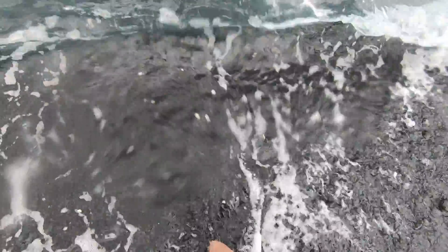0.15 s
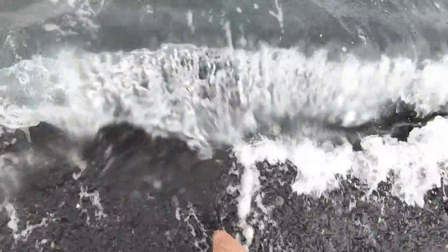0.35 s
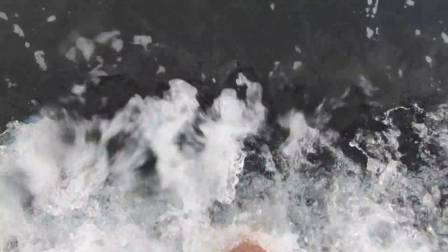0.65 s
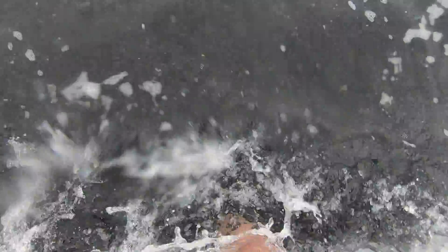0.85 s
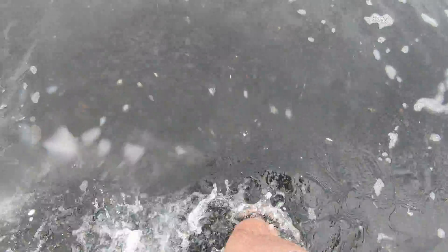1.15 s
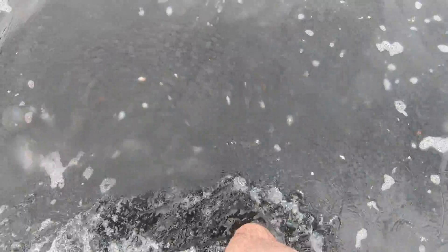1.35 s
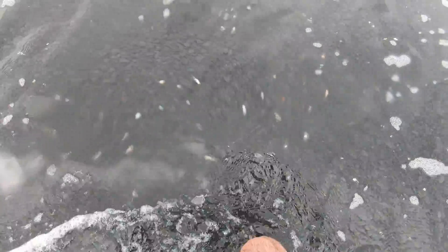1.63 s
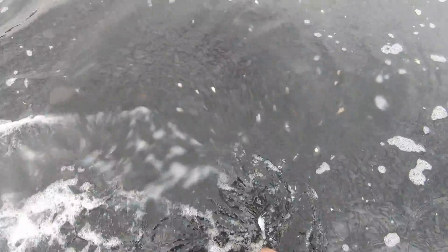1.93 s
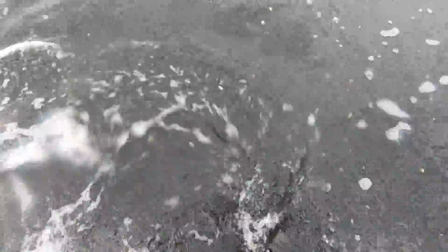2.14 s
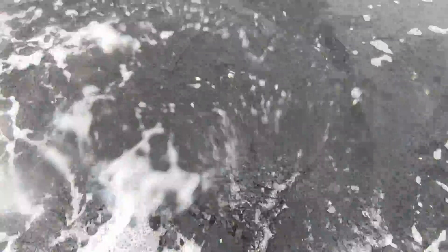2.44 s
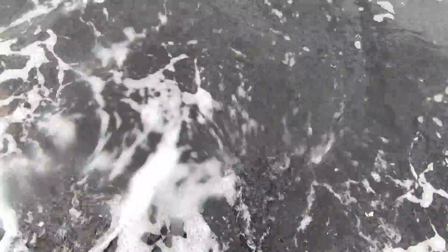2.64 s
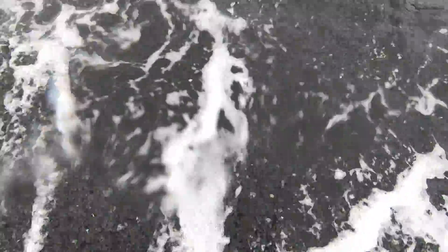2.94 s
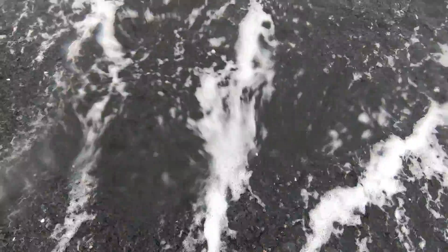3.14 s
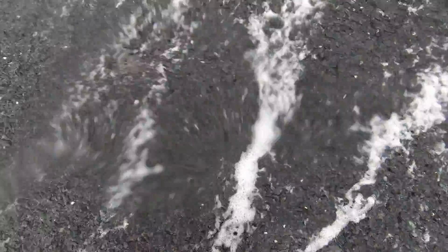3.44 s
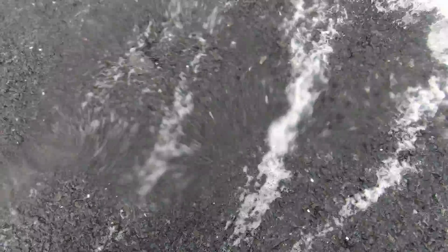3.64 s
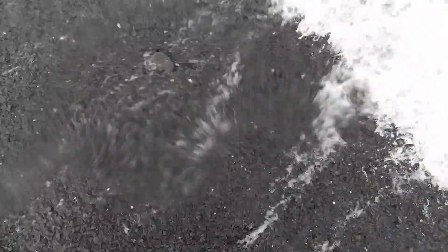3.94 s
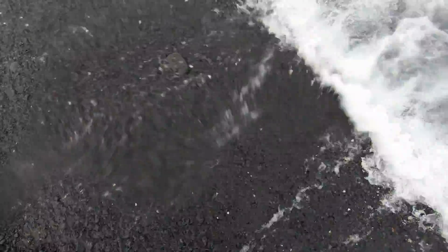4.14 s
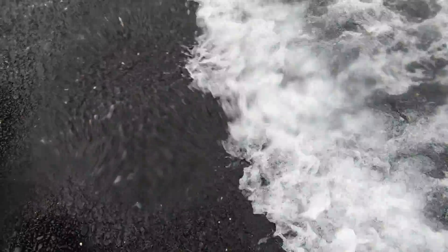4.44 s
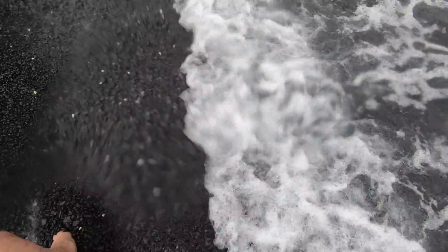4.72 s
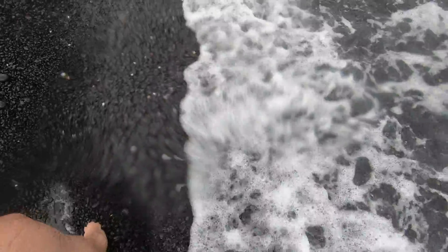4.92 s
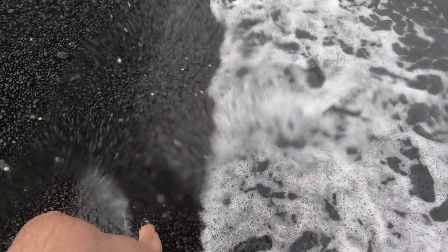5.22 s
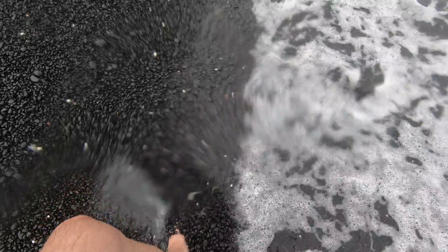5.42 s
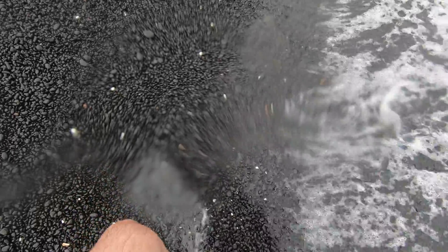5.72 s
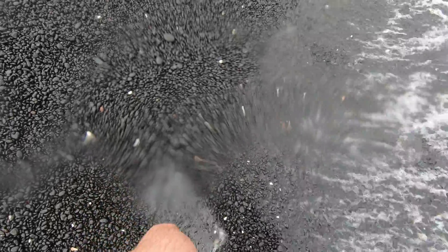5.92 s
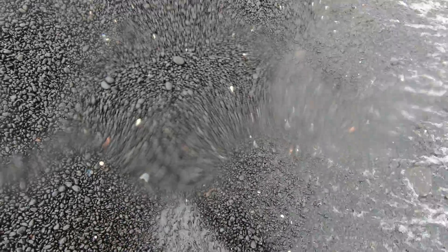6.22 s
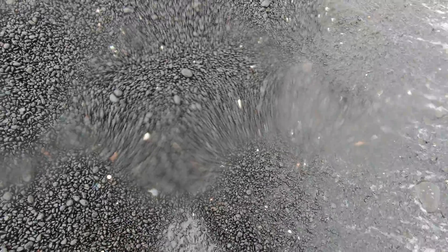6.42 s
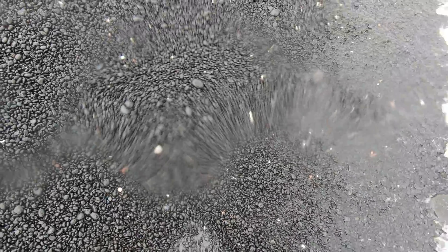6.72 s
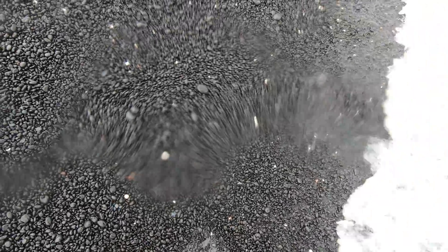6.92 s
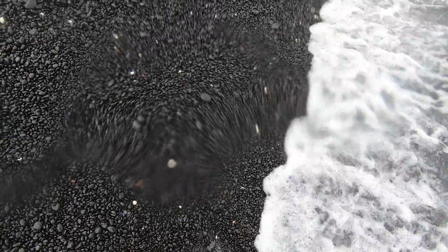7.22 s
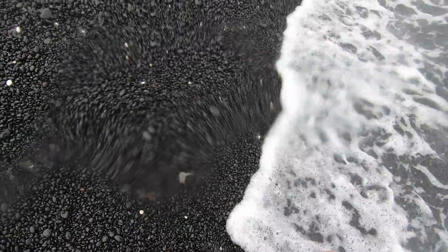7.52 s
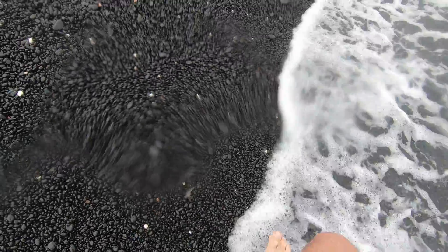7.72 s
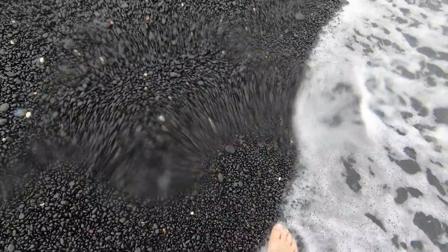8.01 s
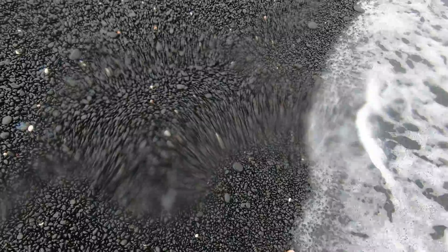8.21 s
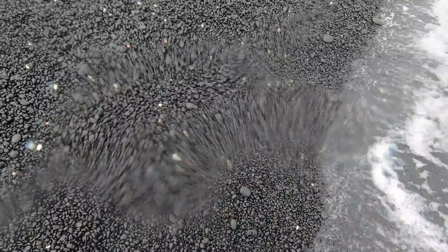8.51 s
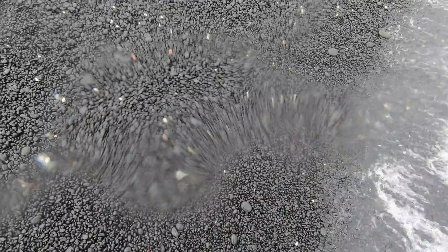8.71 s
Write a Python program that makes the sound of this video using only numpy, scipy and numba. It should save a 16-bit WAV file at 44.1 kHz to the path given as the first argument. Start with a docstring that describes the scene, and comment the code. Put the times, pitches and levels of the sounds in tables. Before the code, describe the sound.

Foamy surf rushes close by and fizzes away on pebbles, interrupted by hollow plastic handling clunks, dragging fingers and low rumbling wind.

```python
"""Small waves hiss up a pebble beach and drain back, heard at the two ports of a hand-held camera in a plastic case.
Foam is noise with bursting bubbles, coloured by the port resonances; big bubbles gulp as chirped sines.
Knocks and dragging fingers ring damped case modes, brief tones squeak, and wind and the ringing after
knocks boom and rumble as narrow noise. A limiter ducks all but the bass after loud peaks."""
import sys
import numpy as np
from scipy import signal
from scipy.fft import next_fast_len
from scipy.io import wavfile
from scipy.ndimage import uniform_filter1d
from numba import njit

SR = 44100
rng = np.random.default_rng(int(sys.argv[2]) if len(sys.argv) > 2 else 0)


def store_wav(level_fs):
    """Save 16-bit WAV to argv[1]."""
    pcm = np.round(np.clip(np.atleast_2d(level_fs), -1, 1) * 32767)
    wavfile.write(sys.argv[1], SR, pcm.T.astype(np.int16))


def convert_level_to_amplitude(level_db):
    """Map a level in decibels to its linear amplitude factor."""
    exponent = np.asarray(level_db, float) / 20
    return 10 ** exponent


N = 390770  # samples


def level(x):
    """Normalisation: scale to a root mean square of 1."""
    return x / np.sqrt(np.mean(x ** 2))


def band(x, lo_hz, hi_hz):
    """Band-pass filtering by a Butterworth response."""
    return signal.sosfilt(signal.butter(2, [lo_hz, hi_hz], "band", fs=SR, output="sos"), x)


def walk(rate, size):
    """Slow random modulation: levels held for 1 / rate s, smoothed twice, with an rms of 1."""
    hold = max(int(SR / rate), 1)
    steps = np.repeat(rng.standard_normal(size // hold + 1), hold)
    return level(uniform_filter1d(uniform_filter1d(steps, hold), hold)[:size])


def curve(table):
    """Linear interpolation: columns of a table drawn out over time."""
    s, *columns = np.transpose(table)
    return [np.interp(np.arange(N) / SR, s, c) for c in columns]


def swells(rows, rise_s, fade_db_per_s):
    """Incoherent addition: events (s, length s, dB) rise, hold and decay exponentially, summed in power."""
    s, length, db = np.transpose(rows)[:, :, None]
    t = np.arange(0, N, 64) / SR
    fade_db = fade_db_per_s * np.maximum(t - s - length, 0)
    gain = np.clip((t - s) / rise_s, 0, 1) * convert_level_to_amplitude(db - fade_db)
    return np.interp(np.arange(N) / SR, t, np.sqrt(np.sum(gain ** 2, axis=0)))


BUBBLES_PER_S, BUBBLE_HZ = 160, (1400, 3600)  # rate for each of six bubble sizes, range of pitch
POPS_DB, BUBBLE_DB = -4, -13  # levels against the hiss


def foam():
    """Shot noise and bubble resonance: hiss, dense pops in patches, and small bubbles ringing for a few cycles."""
    pop_gain = convert_level_to_amplitude(np.minimum(2.5 * rng.exponential(size=N), 9))
    pops = (rng.random(N) < 1500 / SR) * rng.standard_normal(N) * pop_gain
    t = np.arange(SR // 100) / SR
    rings = np.zeros(N)
    for hz in np.geomspace(*BUBBLE_HZ, 6):
        bursts = (rng.random(N) < BUBBLES_PER_S / SR) * rng.random(N)
        ring = np.sin(2 * np.pi * hz * t * (1 + hz * t / 60)) * np.exp(-t * hz / 4)  # the pitch rises
        rings += signal.oaconvolve(bursts, ring)[:N]
    patchy_pops = level(pops * convert_level_to_amplitude(2 * walk(16, N)))
    return level(rng.standard_normal(N) + convert_level_to_amplitude(POPS_DB) * patchy_pops + convert_level_to_amplitude(BUBBLE_DB) * level(rings))


# The state of the water near the feet, its mean removed before use; froth brightens the hiss, depth fills
# out the gush. Each row: time in seconds, wash in dB, froth in dB, depth in dB.
WATER = [(0.0, -51, -3, 3), (0.17, -44.5, -3.5, -4), (0.49, -42, 7.5, 3.5), (0.68, -39.5, 4, 7.5),
         (1.0, -45, -0.5, 8.5), (1.3, -45, -13, 9), (1.52, -46.5, -13.5, 7), (1.75, -46, -14, -2),
         (3.01, -44.5, 4, -6.5), (3.45, -44.5, 6.5, -4.5), (3.75, -37.5, -1.5, -6), (3.95, -42, -0.5, -2.5),
         (4.88, -55, 7, 4), (5.38, -54, 14.5, 2), (6.0, -48, 0.5, -2), (6.22, -41.5, -2.5, -1),
         (6.75, -50.5, -1.5, 2.5), (7.05, -49, -7.5, 5), (7.45, -53, -9, 0.5), (7.87, -62.5, 6, 2),
         (8.34, -57.5, -4.5, 2), (8.51, -56.5, 0, 4.5), (8.86, -47.5, 2.5, 1.5)]
# Places of the surf's parts in the spectrum: thunder, roar, gush, wash, fizz and spray, each in Hz.
SURF_PARTS_HZ = (300, 750, 1500, 2800, 5500, 11000)
# Breakers collapsing; the last row is a low roar from handling of the case.
# Each row: start in seconds, length in seconds, roar and thunder in dB above the lull.
ROARS = [(0.198, 0.51, 22.4, 21.4), (3.03, 1, 8.5, 12.4), (4.15, 0.9, 11.8, 21.6), (6.12, 0.65, 18, 18.4),
         (8.3, 0.64, 14, 8.8)]
# Splashes of spray close by. Each row: time in seconds, level in dB above the foam.
SPLASHES = [(0.271, 9.5), (7.464, 4), (7.485, 6), (7.576, 3.5), (7.627, 7), (7.688, 10), (7.97, 5.5)]
# Colour of the two ports. Each row: frequency in Hz, left and right relative level in dB.
PORTS = [(193, -17.5, -14.5), (580, -25, -16), (954, -20, -13), (1150, -5.5, -6), (1340, -14, -9),
         (1426, -2.5, -3.5), (1560, -7.5, -5), (1980, -9, -4.5), (2890, -8, -9), (3180, -14, -13),
         (4300, -25.5, -19), (5170, -19.5, -13.5), (5760, -16.5, -9), (7360, -26.5, -21),
         (10080, -40.5, -40.5), (12700, -57, -53)]
# How alike the ports hear the surf. Each row: frequency in Hz, likeness from 0 to 1, lead of the left in radians.
LIKENESS = [(192, .7, -.3), (430, .5, -1), (700, .8, -3.3), (1200, .98, -4), (1500, .96, -4.7),
            (2200, .85, -5.8), (2650, .35, -5.5), (3300, .75, -4.9), (4300, .45, -5.1), (4900, .7, -3.3),
            (5900, .65, -3.6), (8600, .2, -3.7), (10300, .28, -6.9)]
SURF_DB = -22.5  # applied after the port colour
FIZZ_PER_FROTH = 0.38  # dB of fizz for each dB of spray
ROAR_RISE_S, ROAR_FADE_DB_PER_S, THUNDER_FADE_DB_PER_S = 0.16, 15.5, 19.5


def surf():
    """Partial coherence and spectral shaping: foam partly shared by the ports, tilted by wave and roars."""
    splash_db = sum(db * np.exp(-((np.arange(N) / SR - s) / 0.0075) ** 2) for s, db in SPLASHES)
    flicker = convert_level_to_amplitude(0.5 * walk(7, N) + walk(25, N) + splash_db)
    hz, s, (shared, own) = signal.stft(flicker * np.array([foam(), foam()]), SR, nperseg=1024)
    log_hz = np.log(hz + 1)

    def spectrum(table):
        table_hz, *columns = np.transpose(table)
        return [np.interp(log_hz, np.log(table_hz), c)[:, None] for c in columns]

    left_db, right_db = spectrum(PORTS)
    alike, lead = spectrum(LIKENESS)
    at = np.minimum(s * SR, N - 1).astype(int)
    wash, froth, depth = (c[at] for c in curve(WATER))
    roars = np.array(ROARS)
    roar_gain = swells(roars[:, [0, 1, 2]], ROAR_RISE_S, ROAR_FADE_DB_PER_S)[at]
    thunder_gain = swells(roars[:, [0, 1, 3]], ROAR_RISE_S, THUNDER_FADE_DB_PER_S)[at]
    roar, thunder = (10 * np.log10(1 + gain ** 2) for gain in (roar_gain, thunder_gain))
    parts = wash + np.array([thunder, roar, depth, 0 * wash, FIZZ_PER_FROTH * froth, froth])
    parts -= parts.mean(axis=1, keepdims=True)  # the ports set the mean colour, the parts move it
    weights = np.array([np.interp(log_hz, np.log(SURF_PARTS_HZ), row) for row in np.eye(len(parts))])
    # below the lowest port point the sound belongs to the wind and the case
    gain = convert_level_to_amplitude(weights.T @ parts) * np.clip(hz / 160, 0, 1)[:, None] ** 2
    left = convert_level_to_amplitude(left_db) * (alike * np.exp(1j * lead) * shared + np.sqrt(1 - alike ** 2) * own)
    right = convert_level_to_amplitude(right_db) * shared
    return signal.istft(gain * np.array([left, right]), SR, nperseg=1024)[1][:, :N] * convert_level_to_amplitude(SURF_DB)


GULPS_PER_S, GULP_HZ = 15, (180, 730)
GULP_DB = -50  # of the loudest bubbles, before the roar and the port gains


def gulps():
    """Bubble resonance: big bubbles plop with a rising pitch, louder during a roar."""
    roar = swells(np.array(ROARS)[:, :3], ROAR_RISE_S, 2 * ROAR_FADE_DB_PER_S)
    out = np.zeros(N + SR)
    t = np.arange(SR // 10) / SR
    for when, pitch, weakness in rng.random((int(GULPS_PER_S * N / SR), 3)):
        i = int(when * N)
        hz = GULP_HZ[0] * (GULP_HZ[1] / GULP_HZ[0]) ** pitch
        chirp = np.sin(2 * np.pi * hz * t * (1 + 0.018 * hz * t))
        plop = chirp * np.exp(-t * hz / 3.6) * (1 - np.exp(-t * hz))
        out[i:i + len(t)] += roar[i] * convert_level_to_amplitude(GULP_DB - 17 * weakness) * plop
    return out[:N] * np.array([[0.3], [1]])


# Modes of the case. Each row: frequency in Hz, 60 dB decay time in seconds, relative level in dB,
# right port gain with sign (the left is 1).
CASE_MODES = [(104, .3, -5, 1.9), (220, .1, -5, -.3), (340, .08, 0, -.75), (620, .026, -3, -1.9),
              (800, .016, -6, -2.2), (1400, .01, -5, .6), (525, 1., -34, 1.), (1790, .8, -31, 1.),
              (1750, .009, -6, .8), (2400, .008, 2, -.4), (3200, .007, -7, .5), (4930, .012, -7, -.6),
              (6280, .006, -13, -.5), (10000, .004, -28, .6)]
# Knocks on the case. Each row: time in seconds, panel, thump and snap strength in dB.
KNOCKS = [(0.148, -27, -34, -60), (0.206, -30, -30, -60), (0.35, -47, -36, -60), (1.4017, -15, -29, -46),
          (1.421, -22, -33, -58), (3.2727, -25, -26, -21.5), (3.352, -36, -23, -38),
          (3.5896, -28, -48, -23), (3.6416, -24.5, -31, -24), (3.8922, -21.5, -20.5, -15),
          (3.9432, -16, -21, -6), (4.0473, -22, -22, -37), (5.758, -33.5, -72, -60),
          (8.0036, -30, -22, -47), (8.071, -44, -37, -60), (8.186, -45, -38.5, -60), (8.265, -41, -49, -60),
          (8.318, -34, -31, -58.5), (8.345, -41, -41, -60), (8.3718, -30.5, -37, -30),
          (8.414, -26.5, -33, -27), (8.463, -37, -27, -45), (8.484, -27, -18, -30),
          (8.4964, -11.5, -29, -9), (8.6496, -2.5, -24, -1)]
# Fingers dragging on the case. Each row: start in seconds, end in seconds, strength in dB.
RUBS = [(0., .28, -43), (1.39, 1.47, -41), (3.03, 3.25, -46), (3.26, 3.41, -30), (3.41, 3.72, -41),
        (8.3, 8.48, -53), (8.48, 8.595, -39), (8.595, 8.625, -30), (8.625, 8.65, -20)]
BODY_DB = 2.5  # the body modes answer this far above midway between panel and thump


def case():
    """Modal excitation: knocks and a jerky drag ring damped modes; some swing opposite ways at the two ports."""
    knocks, t, out = np.array(KNOCKS), np.arange(SR // 2) / SR, np.zeros((2, N))
    s, panel, thump, snap = knocks.T
    body = (panel + thump) / 2 + BODY_DB
    long_ring, top_modes = 4 * snap, 2 * snap  # these need a hard blow
    blows_db = [thump, body, panel, snap, long_ring, top_modes]
    spot_db = 2 * rng.standard_normal((len(knocks), len(CASE_MODES)))  # each blow lands on another spot
    # the fingers stick and slip
    drag = sum(convert_level_to_amplitude(db) * (np.arange(N) >= a * SR) * (np.arange(N) < b * SR) for a, b, db in RUBS)
    drag = uniform_filter1d(drag, 600) * convert_level_to_amplitude(2.5 * walk(45, N))
    for k, (hz, t60, db, right) in enumerate(CASE_MODES):
        if hz < 450:
            blow = 0 if hz < 150 else 1
        elif t60 > 0.5:
            blow = 4
        else:
            blow = 2 if hz < 1000 else 3 if hz < 2000 else 5
        ring = np.sin(2 * np.pi * hz * t) * convert_level_to_amplitude(-60 * t / t60) * (1 - np.exp(-t * hz / 1.9))
        ring /= abs(ring).max()
        # the soft drag hardly reaches the high modes and never the long rings
        push = drag * rng.standard_normal(N) * (t60 < 0.2) / np.sqrt(np.sum(ring ** 2))
        push /= 1 + (hz / 1300) ** 4 + (400 / hz) ** 2
        lead_s = 0.001 if blow >= 3 else 0  # the snap comes first, the panels swing up after it
        np.add.at(push, ((s - lead_s) * SR).astype(int), convert_level_to_amplitude(blows_db[blow] + spot_db[:, k]))
        out += convert_level_to_amplitude(db) * signal.oaconvolve(push, ring)[:N] * np.array([[1], [right]])
    # dull scrape carried straight to the ports
    scrape = drag * convert_level_to_amplitude(-4.5) * level(band(rng.standard_normal(N), 160, 440))
    return out + scrape * np.array([[0.4], [1]])


# Short tones near the ports, from plops, drops or a wet finger.
# Each row: start in seconds, length in seconds, frequency in Hz, level in dB.
SQUEAKS = [(0.24, .035, 205, -28), (0.369, 0.02, 287, -33.5), (0.458, 0.011, 6200, -34),
           (2.238, 0.015, 1410, -36), (7.016, 0.015, 1667, -29.5), (8.598, 0.017, 1590, -34)]


def squeaks():
    """Frequency modulation: brief, slightly unsteady sines with a quick start."""
    out = np.zeros(N)
    for s, length, hz, db in SQUEAKS:
        t = np.arange(int(length * SR)) / SR
        turns = np.cumsum(hz * (1 + 0.011 * walk(200, len(t)))) / SR
        swell = np.sqrt(np.sin(np.pi * (t / length) ** 0.54))
        out[int(s * SR):][:len(t)] += convert_level_to_amplitude(db) * np.sin(2 * np.pi * turns) * swell
    return out


def wavering(lo_hz, hi_hz, even):
    """Envelope compression: narrow noise with its own swells partly evened out, so that its drive sets its level."""
    z = signal.hilbert(band(rng.standard_normal(next_fast_len(N)), lo_hz, hi_hz))[:N]
    return level(z.real / (abs(z) + 0.062 * abs(z).mean()) ** even)


# The breeze between booms. Each row: time in seconds, relative level in dB.
BREEZE = [(0., -35), (.9, -45), (1.7, -43), (2.5, -52), (3.4, -34), (4.4, -50), (5.3, -51), (5.5, -45),
          (6.4, -40.5), (7.0, -47), (7.7, -46), (8.1, -38), (8.86, -56.5)]
# Booms of the case, from gusts and from the ringing after knocks.
# Each row: start in seconds, length in seconds, relative level in dB.
BOOMS = [(.03, 0.19, -33), (.39, 0.032, -32), (1.02, 0.12, -31.5), (1.37, 0.077, -29.5),
         (1.49, 0.038, -21.5), (2.04, 0.014, -33), (2.87, 0.079, -27.5), (3.0, 0.067, -32.5),
         (3.18, 0.045, -27.5), (3.27, 0.017, -22.5), (3.33, 0.18, -19.5), (3.58, 0.11, -23.5),
         (3.9, 0.048, -21), (3.945, 0.025, -17.5), (4.045, 0.026, -16), (4.88, 0.038, -32),
         (5.41, 0.1, -34), (5.73, 0.045, -34.5), (6.07, 0.16, -37.5), (6.36, 0.039, -40),
         (6.73, 0.027, -34), (7.41, 0.036, -36.5), (7.83, 0.15, -34), (8.0, 0.013, -21.5),
         (8.31, 0.071, -24.5), (8.485, 0.02, -17), (8.52, 0.072, -19), (8.6, 0.062, -20.5),
         (8.73, 0.07, -28.5)]
BOOM_RISE_S, BOOM_FADE_DB_PER_S = 0.012, 249
BREEZE_RUMBLE_DB, BOOM_RUMBLE_DB = -1.5, -14  # rumble drive against boom drive, in the breeze and in a boom


def wind_and_booms():
    """Narrow-band excitation: breeze and booms drive the lowest case mode, rumble below and buffeting above."""
    breeze = convert_level_to_amplitude(curve(BREEZE)[0] + 4 * walk(9, N) - 1)
    booms = swells(BOOMS, BOOM_RISE_S, BOOM_FADE_DB_PER_S) * convert_level_to_amplitude(2 * walk(20, N))
    boom_db = 20 * np.log10(np.hypot(breeze, booms))
    rumble_db = 20 * np.log10(np.hypot(convert_level_to_amplitude(BREEZE_RUMBLE_DB) * breeze, convert_level_to_amplitude(BOOM_RUMBLE_DB) * booms))
    boom = [wavering(98.55, 111.66, 1.0) for _ in range(2)]
    rumble = [wavering(43.6, 69.0, 0.37) + 0.2 * wavering(27, 138, 0.14) for _ in range(2)]
    puffs = convert_level_to_amplitude(rumble_db - 14 + 5 * walk(14, N))
    buffet = [puffs * level(band(band(rng.standard_normal(N), 121, 275), 121, 275)) for _ in range(2)]
    rumble_gain = convert_level_to_amplitude(rumble_db + 4.5)
    # the left port shares part of the right port's noise, and booms less
    left = convert_level_to_amplitude(boom_db - 5.5) * (0.59 * boom[0] + 0.7 * boom[1])
    left += rumble_gain * (0.57 * rumble[0] + 0.44 * rumble[1])
    right = convert_level_to_amplitude(boom_db + 3.0) * boom[0] + rumble_gain * rumble[0]
    return np.array([left, right]) + buffet


def scene():
    """Superposition: surf, handling and wind add at the two ports."""
    return surf() + gulps() + case() + squeaks() + wind_and_booms()


@njit
def limiter(peak, top, depth, attack, release):
    """Dynamic range control: gain falls fast when the smoothed peak passes the ceiling and creeps back."""
    gain, e = np.ones(len(peak)), 0.
    for i in range(len(peak)):
        e += (peak[i] - e) * (attack if peak[i] > e else release)
        if e > top:
            gain[i] = (top / e) ** depth
    return gain


def roll_off(x):
    """The treble ends steeply here."""
    return signal.sosfilt(signal.butter(12, 15600, fs=SR, output="sos"), x)


def record(dry):
    """Band-split limiting: only the sound above the bass is ducked, then all meets a soft ceiling."""
    bass = signal.sosfiltfilt(signal.butter(2, 420, fs=SR, output="sos"), dry)
    rest = dry - bass
    attack_s, release_s = 0.002, 0.3
    gain = limiter(abs(rest).max(axis=0), 0.17, 2.1, 1 / (attack_s * SR), 1 / (release_s * SR))
    # the gain lags by 5 ms, so the snap gets through
    late = np.r_[np.ones(int(0.005 * SR)), uniform_filter1d(gain, 200)][:N]
    mix = np.tanh(bass + rest * late)
    return roll_off(mix)


dry = scene()
out = record(dry)
store_wav(out)
```